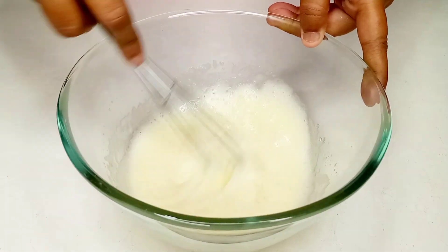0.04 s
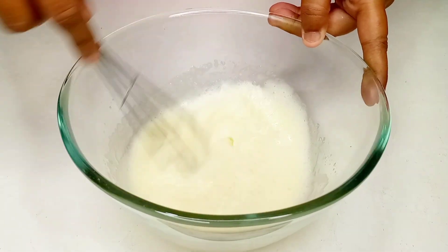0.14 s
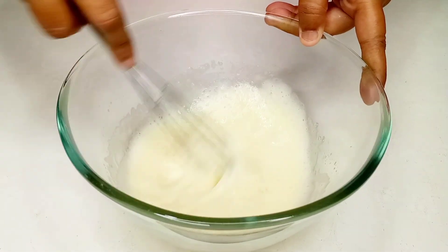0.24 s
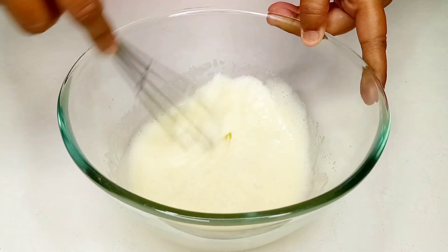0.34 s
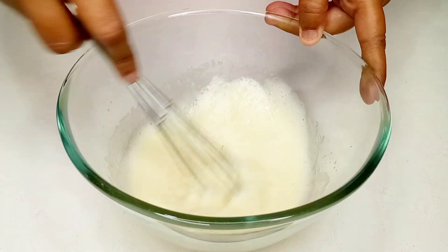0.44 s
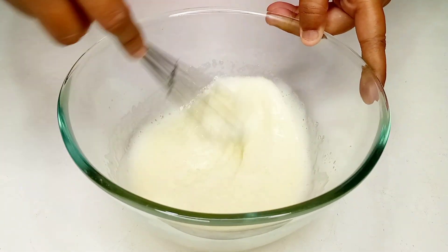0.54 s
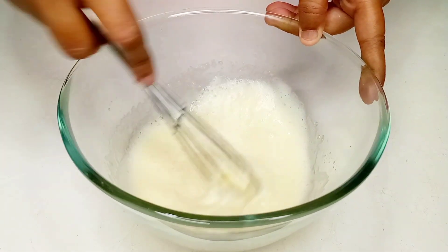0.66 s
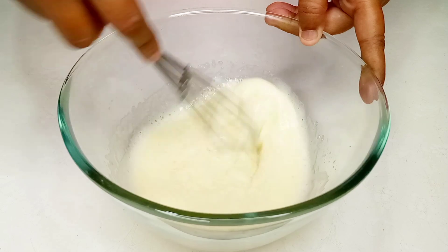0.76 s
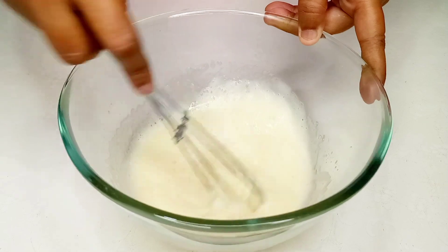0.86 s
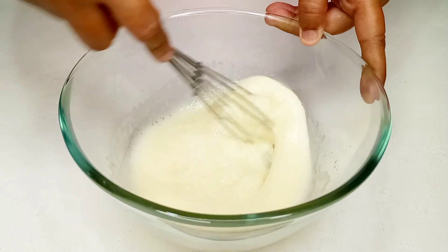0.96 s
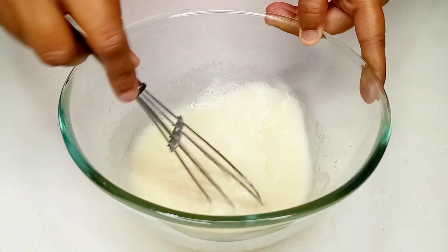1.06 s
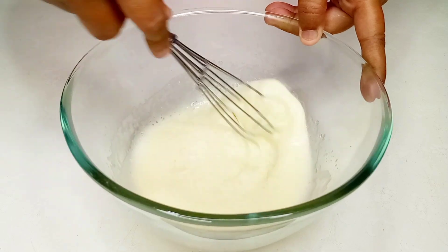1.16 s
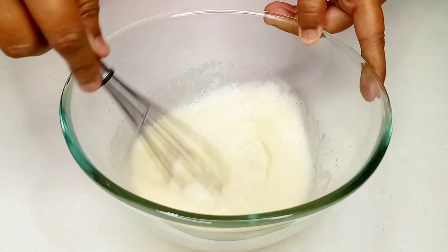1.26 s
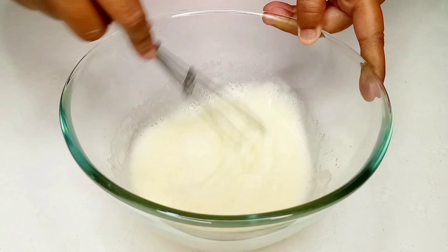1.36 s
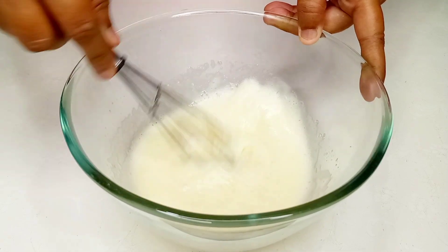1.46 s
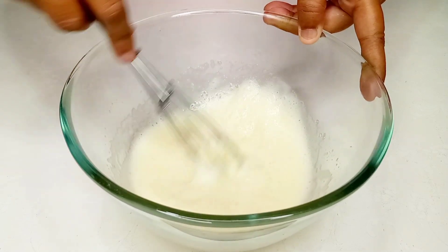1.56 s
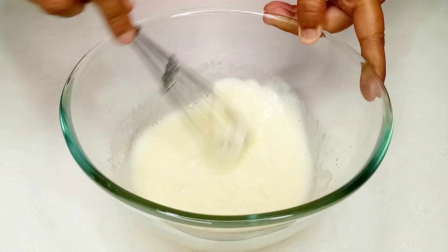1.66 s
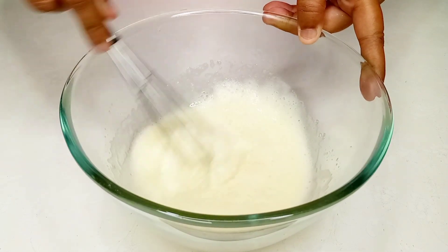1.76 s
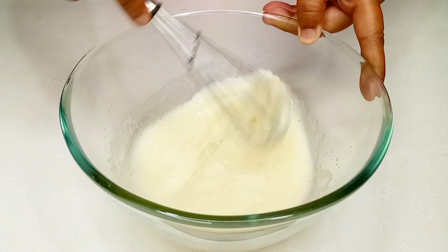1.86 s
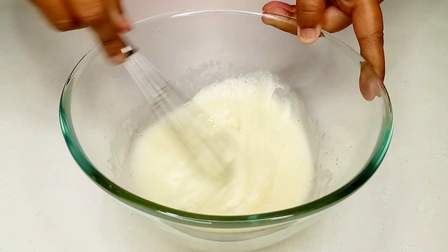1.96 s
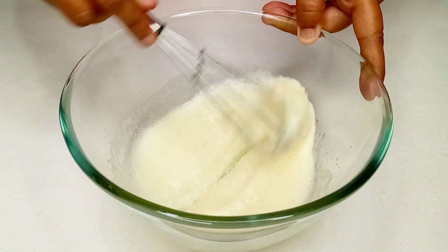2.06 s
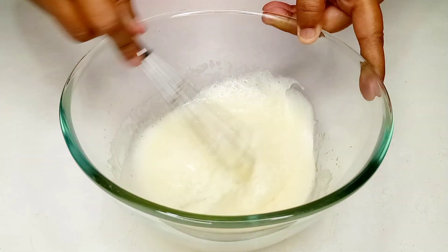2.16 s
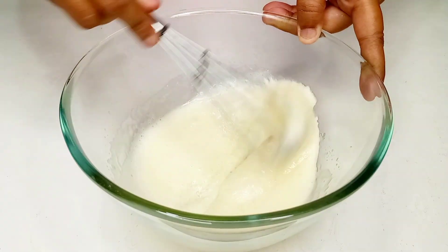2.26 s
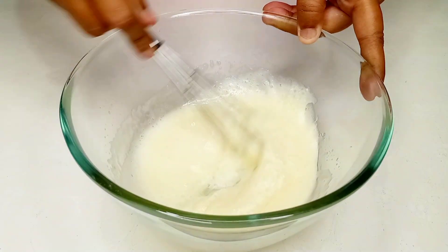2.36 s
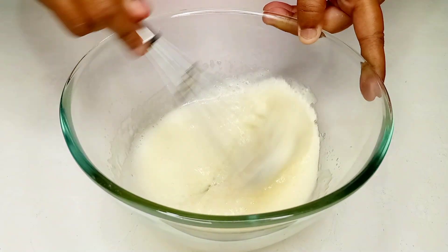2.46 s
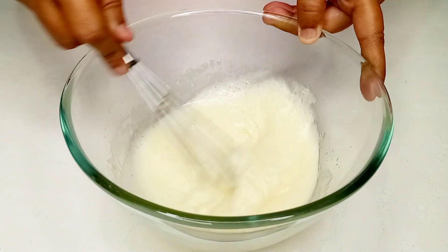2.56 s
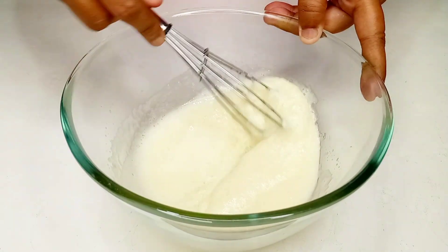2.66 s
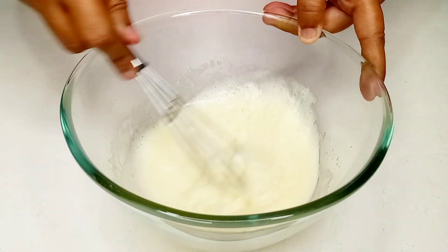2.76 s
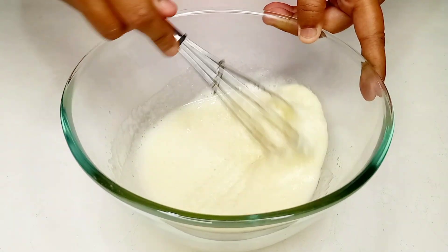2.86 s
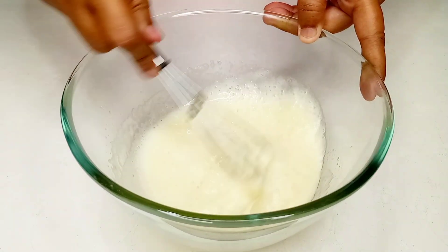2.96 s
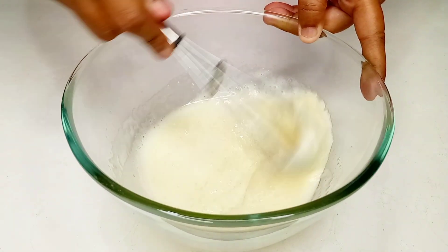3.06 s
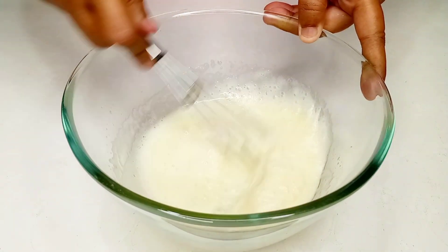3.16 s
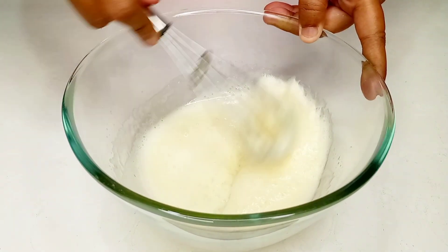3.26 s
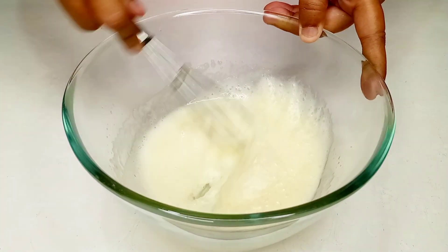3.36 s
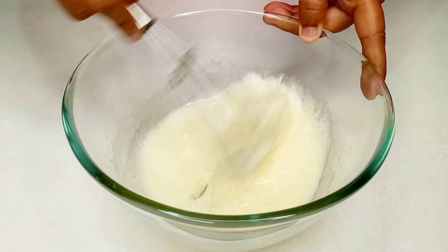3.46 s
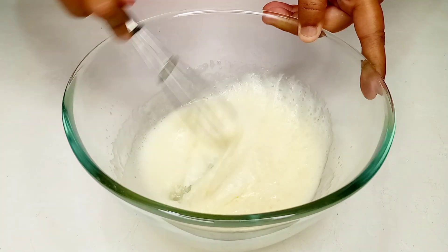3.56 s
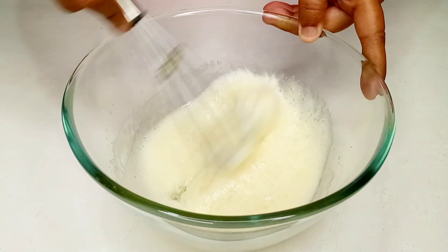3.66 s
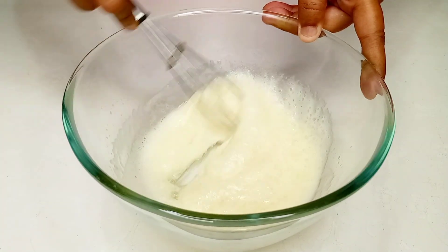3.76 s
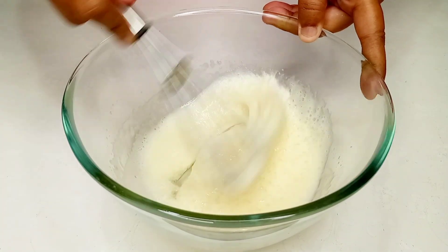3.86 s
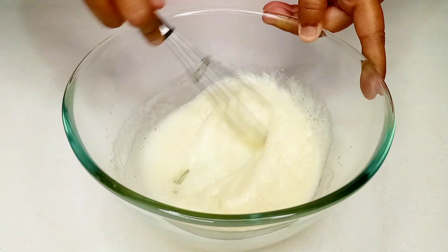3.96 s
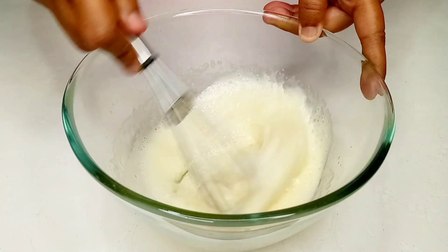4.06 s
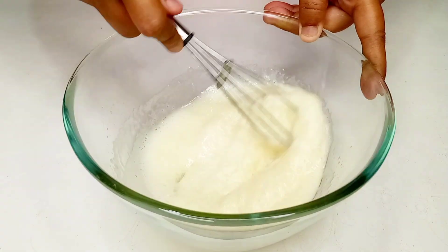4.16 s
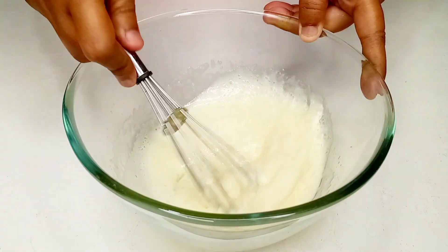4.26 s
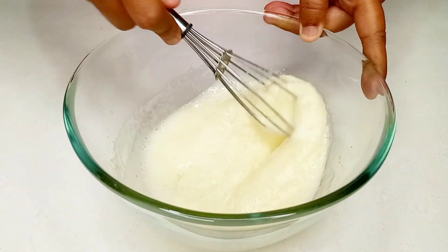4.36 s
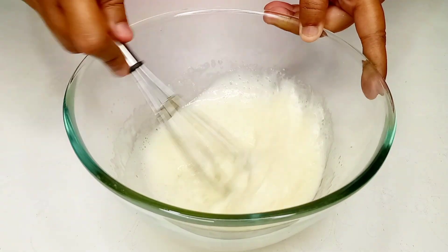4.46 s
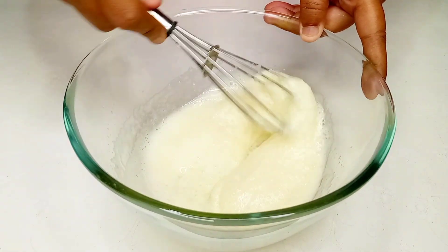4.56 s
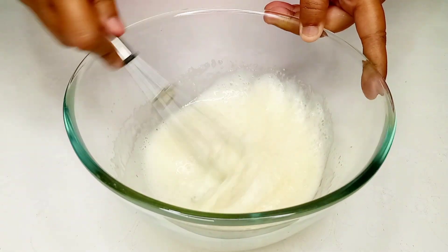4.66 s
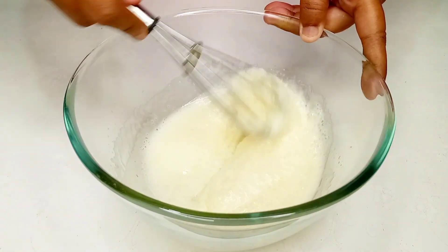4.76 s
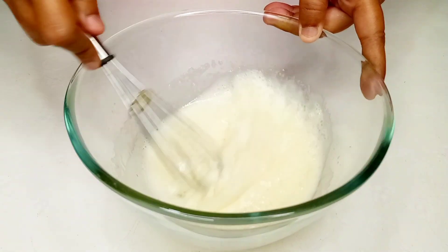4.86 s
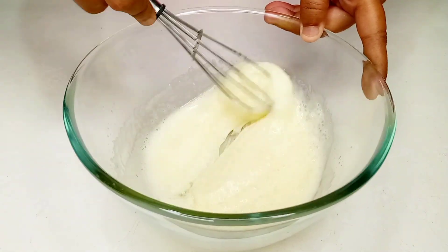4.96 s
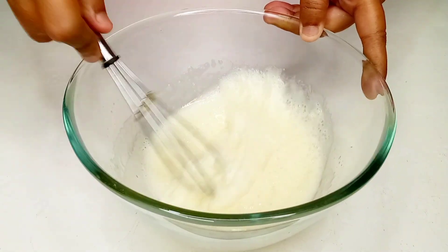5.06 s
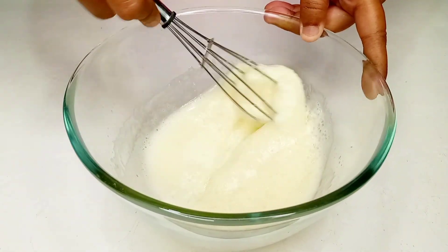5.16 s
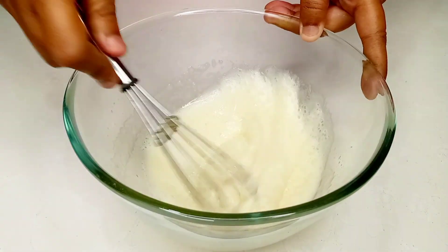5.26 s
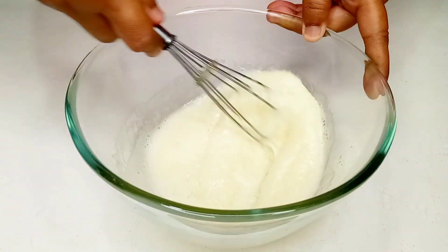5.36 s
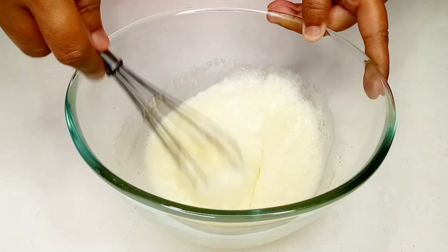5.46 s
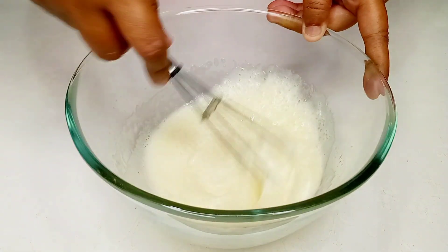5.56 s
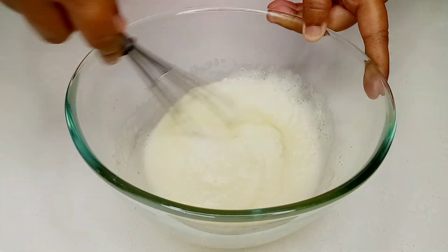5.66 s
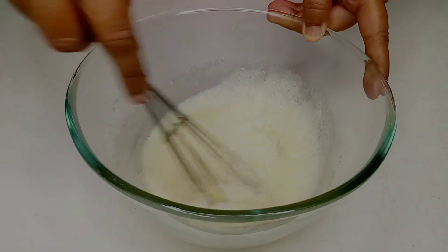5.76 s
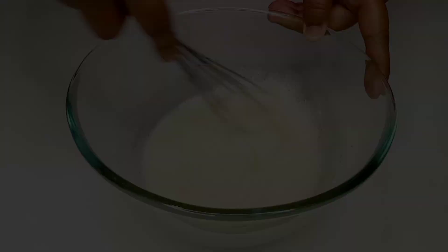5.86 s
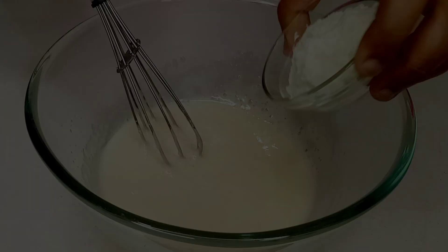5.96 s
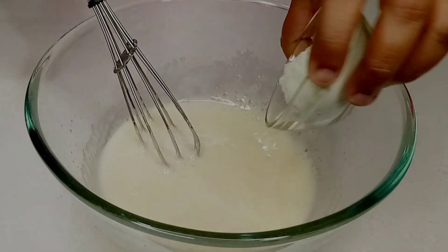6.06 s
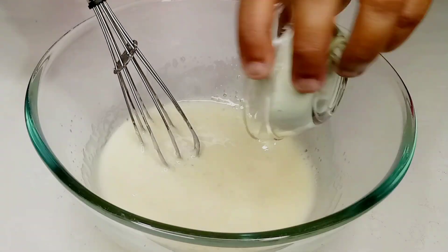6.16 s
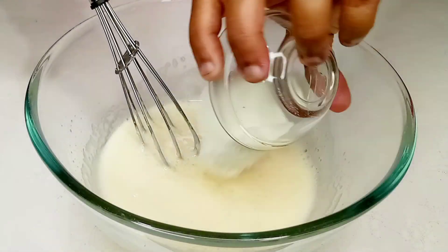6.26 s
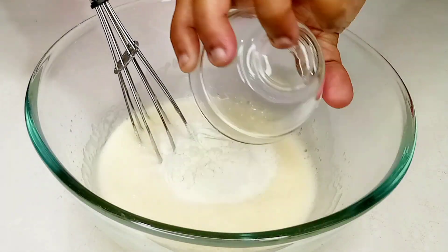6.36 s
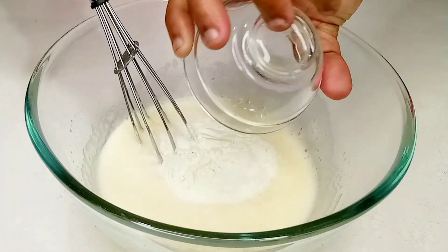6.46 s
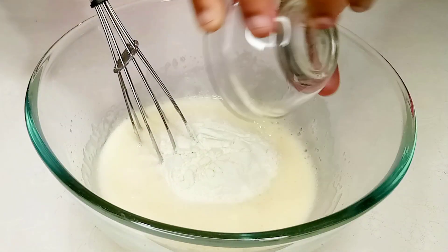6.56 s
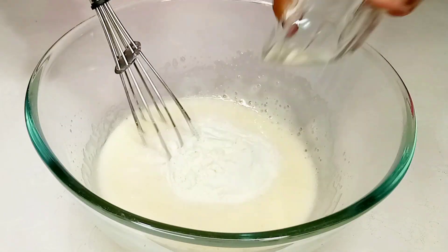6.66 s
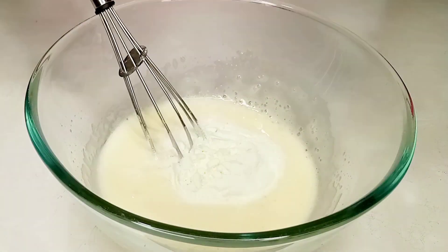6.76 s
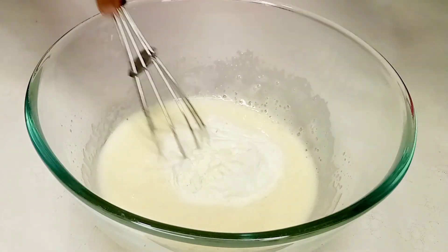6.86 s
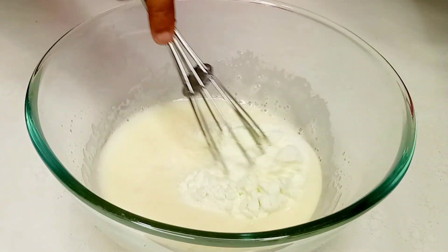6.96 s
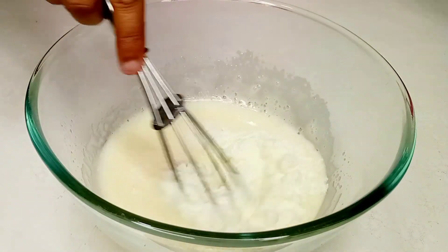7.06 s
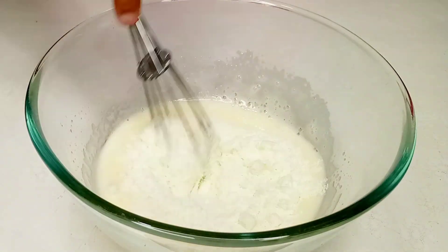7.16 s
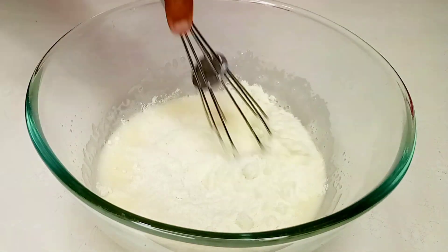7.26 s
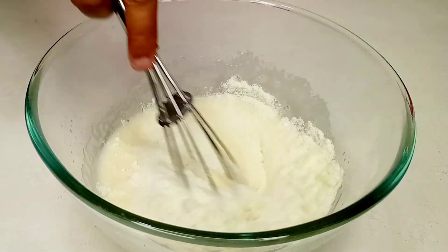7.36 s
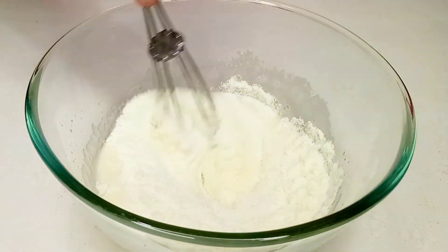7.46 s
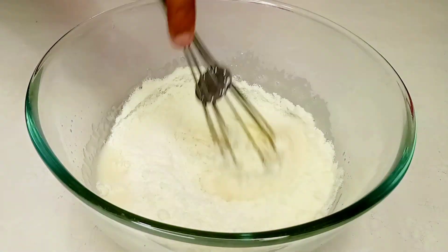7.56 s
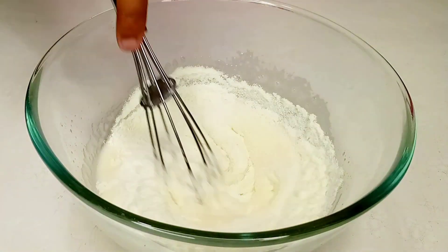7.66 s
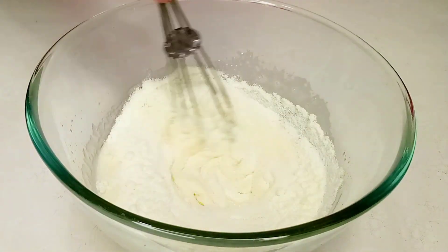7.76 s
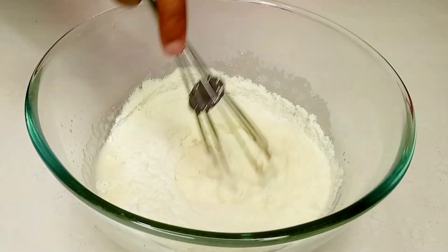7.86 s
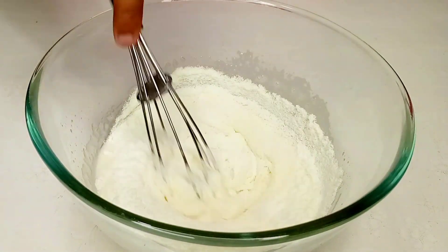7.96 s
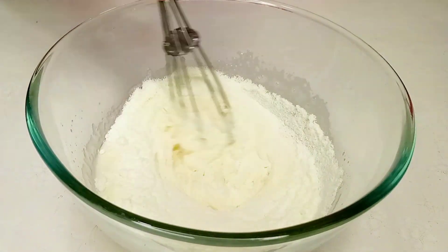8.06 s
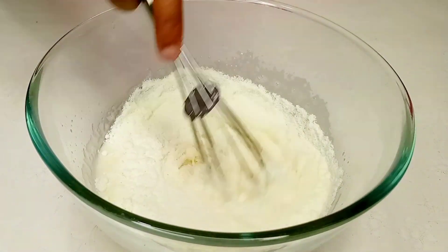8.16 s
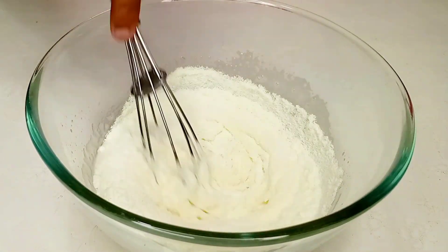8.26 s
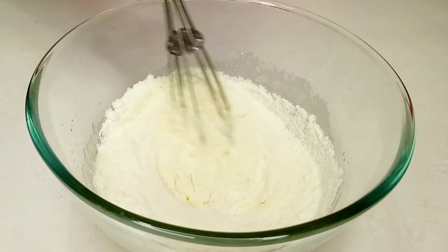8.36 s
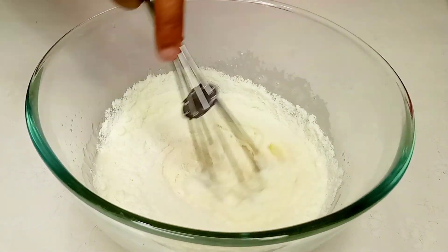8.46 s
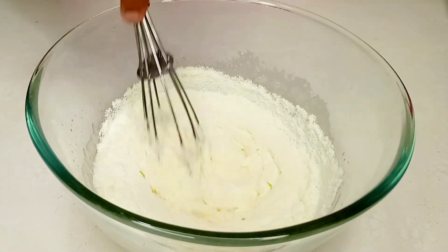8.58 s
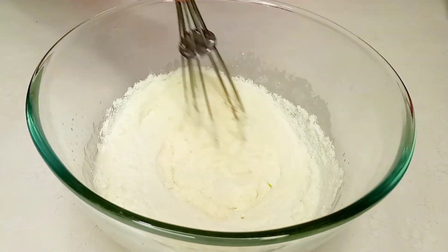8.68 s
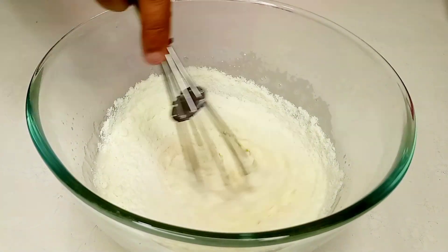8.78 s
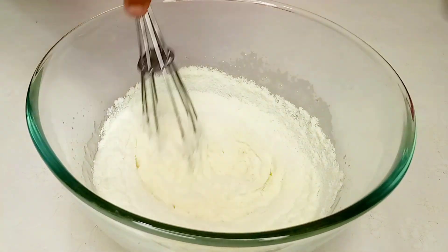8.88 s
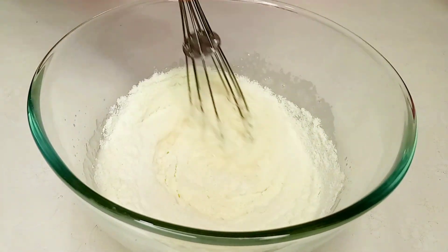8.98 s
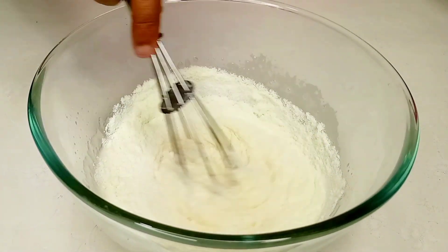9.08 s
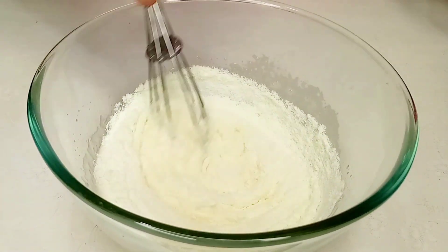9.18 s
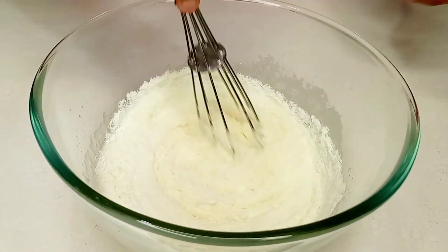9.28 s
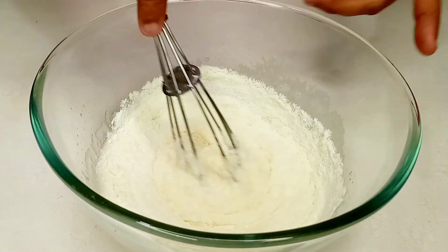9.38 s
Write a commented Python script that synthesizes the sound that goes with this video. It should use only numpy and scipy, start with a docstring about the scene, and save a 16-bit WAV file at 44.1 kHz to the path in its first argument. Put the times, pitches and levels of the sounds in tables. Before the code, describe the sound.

Close microphone, short room reverberation. Bright, jangly wires strike and drag along glass, with low bowl knocks and grainy batter splashes beneath. Beating begins as a fast rattle, then becomes slower and stronger, alternating a hard slap with a lighter return, with occasional clinks. After a very short gap of silence the whisk stirs gently, a soft swishing scrape with scattered dull bumps, far below the earlier level.

```python
"""Whisk and batter in a glass bowl

A wire whisk beats batter on a kitchen counter, fast at first, then gently after a short silence.
Each slap is a patter of noise; the drag along the glass is a stream of random grains.
Knocks excite damped modes of the loops, glass, bowl and counter; batter is coloured noise and grains.
A decaying random tail supplies the reverberation of the room.
"""
import sys
import numpy as np
from scipy import signal
from scipy.fft import rfft, irfft
from scipy.io import wavfile

SR = 44100
rng = np.random.default_rng(int(sys.argv[2]) if len(sys.argv) > 2 else 0)


def unload_audio(sound):
    """Save the sound as a 16-bit wav file, at the path given as the first command line argument."""
    columns = np.transpose(np.atleast_2d(sound))
    # keep every value between -1 and 1, then stretch to whole-number steps
    steps = np.round(np.clip(columns, -1, 1) * 32767)
    wavfile.write(sys.argv[1], SR, steps.astype(np.int16))


def to_linear_factor(level_db):
    """Convert decibel levels (scalar or array-like) to linear amplitude factors."""
    exponent = np.asarray(level_db, float) / 20
    return 10 ** exponent


N = 415422
SILENCE_START_S, SILENCE_END_S = 5.936, 6.066


def rms_one(x):
    """Normalisation: scale to an rms value of 1."""
    return x / np.sqrt(np.mean(x ** 2) + 1e-20)


def in_time(rows):
    """Linear interpolation: join the columns of a table by straight lines in time."""
    s, *columns = np.transpose(rows)
    return [np.interp(np.arange(N) / SR, s, column) for column in columns]


def samples_of(events):
    """Sampling: the nearest sample to the start of each event."""
    return [round(row[0] * SR) for row in events]


def coloured(x, spectrum):
    """Minimum-phase filtering: folding the cepstrum makes the given spectrum causal."""
    hz, level_db = np.transpose(spectrum)
    grid = np.fft.rfftfreq(4096, 1 / SR)
    log_level = np.interp(np.log(grid + 1), np.log(hz), level_db) * np.log(10) / 20
    cepstrum = irfft(log_level)
    cepstrum[1:2048] *= 2
    cepstrum[2049:] = 0
    response = rms_one(irfft(np.exp(rfft(cepstrum)))) / 64   # unit energy over 4096 samples
    return signal.fftconvolve(x, response)[:len(x)]


def drift(rate_hz):
    """Low-pass random process: white noise through two equal poles, rms 1."""
    r = np.exp(-2 * np.pi * rate_hz / SR)
    settling = SR // 4
    noise = rng.standard_normal(N + settling)
    return rms_one(signal.lfilter([1], [1, -2 * r, r * r], noise)[settling:])


def ring(clicks, hz, t60):
    """Damped resonance: a unit click starts a sine of height 1 that falls 60 dB in t60 seconds."""
    r, w = to_linear_factor(-60 / (t60 * SR)), 2 * np.pi * hz / SR
    return signal.lfilter([0, np.sin(w)], [1, -2 * r * np.cos(w), r * r], clicks + 1e-18)


def grains(per_s, spread_db):
    """Shot noise: random clicks of uneven size and sign, rms 1."""
    sizes = to_linear_factor(spread_db * np.minimum(rng.exponential(1, N), 5))
    sizes = sizes * rng.choice([-1, 1], N)
    return rms_one(sizes * (rng.random(N) < per_s / SR))


def body(modes, events, blows_db, rubbing, vary_db, contact_s, wander_db=0, lean_db=0):
    """Modal superposition: each blow drives every mode with its own strength; rubbing keeps them murmuring."""
    rough_share, lean_pivot_hz = 0.55, 430   # rough push against one firm tap
    at = samples_of(events)
    chance = rng.standard_normal((len(events), len(modes)))
    blows_db = np.broadcast_to(blows_db, chance.T.shape)
    fade = np.exp(-1 / (contact_s * SR))
    out = np.zeros(N)
    for k, (hz, level_db, t60) in enumerate(modes):
        tap = np.full(N, 1e-18)
        tap[at] = to_linear_factor(blows_db[k] + vary_db * chance[:, k])
        rough = signal.lfilter([np.sqrt(1 - fade ** 2)], [1, -fade], tap)
        push = rough_share * rough + (1 - rough_share) * tap
        push *= rng.choice([-1, 1], N)
        # a longer ring gathers more of the rubbing
        rub = rubbing * to_linear_factor(wander_db * np.tanh(drift(13.0))) / np.sqrt(t60 * SR)
        lean = to_linear_factor(lean_db * np.log2(hz / lean_pivot_hz))
        out += to_linear_factor(level_db) * ring((push + rub) * lean, hz, t60)
    return out


def patchy(x, patchy_db, rate_hz, sweep_db=0):
    """Subband modulation: quarter-octave bands swell on their own while a bright patch may sweep across."""
    edges = 150 * 2 ** np.arange(0, 7.1, .25)
    centre = 17 + 5 * drift(2)   # number of the band on which the patch sits
    out = np.zeros(N)
    for k, band in enumerate(zip(edges, edges[1:])):
        part = signal.sosfilt(signal.butter(2, band, "band", fs=SR, output="sos"), x)
        patch_db = sweep_db / (1 + ((k - centre) / 2) ** 2)
        swell = to_linear_factor(patchy_db * np.tanh(drift(rate_hz)) + patch_db)
        out += (-1) ** k * swell * part   # alternating signs keep the seams from cancelling
    return out


def split(x):
    """Band splitting: the parts below and above the sizzle edge."""
    edge_hz = 11000
    return [signal.sosfilt(signal.butter(4, edge_hz, kind, fs=SR, output="sos"), x)
            for kind in ("low", "high")]


def new_strokes():
    """Onset grouping: times of the fast slaps that follow a pause."""
    gap_s = 0.095
    s = np.transpose(SLAPS)[0]
    return s[1:][(np.diff(s) > gap_s) & (s[1:] < SILENCE_START_S)]


def kitchen(x):
    """Statistical reverberation: a dense random tail that builds up late, decays and is softened in the treble."""
    t60_s, build_s, cut_hz = 0.26, 0.02, 0.45 * SR
    t = np.arange(SR // 2) / SR
    tail = rng.standard_normal(len(t)) * to_linear_factor(-60 * t / t60_s) * (1 - np.exp(-t / build_s))
    tail = signal.lfilter(*signal.butter(1, cut_hz, fs=SR), tail)
    return signal.fftconvolve(x, tail / np.sqrt(np.sum(tail ** 2)))[:N]


# modes of the counter top: (f/Hz, level/dB, t60/s)
COUNTER_MODES = [(93, 0, .22), (116, -5, .15), (166, -3, .22), (205, -9, .12)]


def counter_top(scrape_db, rumble, counter_db):
    """Structure-borne sound: the counter takes a share of the bowl's thud and of the drag."""
    blow_db, rub_db = -5.5, 9
    _, peak_db, thud_db, _ = np.transpose(SLAPS)
    sound = body(COUNTER_MODES, SLAPS, peak_db + thud_db + blow_db,
                 to_linear_factor(scrape_db + rub_db) * rumble, vary_db=1.5, contact_s=0.024)
    return to_linear_factor(counter_db) * sound


# spectrum of batter thrown on the wall: (f/Hz, level/dB)
SPLASH_SPECTRUM = [(200, -10.5), (400, -13.5), (800, 2.5), (1500, -7.5), (2500, -12), (5000, -48.5)]


def splash(blows_db, decay_s):
    """Decaying shot noise: each slap throws batter in a grainy burst that dies away."""
    blows = np.full(N, 1e-18)
    blows[samples_of(SLAPS)] = to_linear_factor(blows_db)
    dying = signal.lfilter([1], [1, -np.exp(-1 / (decay_s * SR))], blows)
    return coloured(dying * grains(3000, spread_db=4.0), SPLASH_SPECTRUM)


# spectrum of batter folding over: (f/Hz, level/dB)
SLOSH_SPECTRUM = [(88, -44.5), (150, -9.5), (356, 3.5), (588, 2), (710, -20), (935, -14.5), (3000, -34.5),
                  (3900, -60), (6600, -120)]


def batter(rumble_db):
    """Filtered noise: batter slosh and spatter follow the drag, and splashes follow the slaps."""
    _, peak_db, thud_db, _ = np.transpose(SLAPS)
    folding = coloured(rng.standard_normal(N), SLOSH_SPECTRUM)
    slosh = to_linear_factor(rumble_db - 9.0) * patchy(folding, patchy_db=9.0, rate_hz=4.9)
    thrown = splash(peak_db + thud_db - 15.5, decay_s=0.037)
    drops = coloured(grains(1400, spread_db=5.5), SPLASH_SPECTRUM)
    spatter = to_linear_factor(rumble_db - 17.0) * patchy(drops, patchy_db=8.0, rate_hz=13.0)
    return slosh + thrown + spatter


# modes of the bowl as a whole: (f/Hz, level/dB, t60/s)
BOWL_MODES = [(299, -2, .18), (361, -4.5, .15), (415, -16, .12), (523, 1, .125), (595, -4.5, .1),
              (646, -8, .1), (753, -11, .13), (923, -13, .1), (1015, -13, .12), (1115, -13, .1)]


def thud_loss_db():
    """Selective excitation: the first blow of a stroke favours higher bowl modes, all other slaps lower ones."""
    stroke_hz, stroke_loss_db, stroke_s = 498, 13, 0.03   # loss one octave away
    return_hz, return_loss_db = 340, 5.5                  # lands on the other side
    s, strokes = np.transpose(SLAPS)[0], np.append(-1, new_strokes())
    latest = strokes[np.searchsorted(strokes, s, side="right") - 1]
    hz = np.transpose(BOWL_MODES)[0][:, None]
    stroke_db = stroke_loss_db * np.log2(hz / stroke_hz) ** 2
    return_db = return_loss_db * np.log2(hz / return_hz) ** 2
    return np.where(s - latest < stroke_s, stroke_db, return_db)


# dull thumps of the loaded whisk on the bowl: (t/s, level/dB, favoured f/Hz)
THUMP_EVENTS = [(0.423, -32.5, 536), (0.575, -34, 300), (0.684, -34.5, 540), (0.789, -36, 300),
                (0.878, -37, 536), (0.993, -32.5, 297), (1.446, -37, 537), (3.767, -27.5, 340),
                (4.907, -26, 357), (4.909, -24, 1020), (4.921, -27, 350), (4.937, -31, 940),
                (4.977, -34, 330), (6.727, -45, 510), (7.321, -50, 515), (7.5435, -37, 620),
                (7.68, -58, 500), (7.71, -46.5, 500), (7.8358, -43.5, 610), (7.852, -45, 610),
                (7.885, -45, 700), (7.93, -46.5, 504), (8.1028, -57, 650), (8.9103, -50, 450)]


def bowl(rumble_db, rumble, lean_db):
    """Forced and free vibration: slaps and thumps set the bowl ringing while the rumble sustains it."""
    thump_loss_db = 28   # one octave from the favoured pitch
    _, peak_db, thud_db, _ = np.transpose(SLAPS)
    thuds = body(BOWL_MODES, SLAPS, peak_db + thud_db + 0.5 - thud_loss_db(),
                 to_linear_factor(rumble_db + 4.0) * rumble, vary_db=1.0, contact_s=0.0078,
                 wander_db=4.5, lean_db=lean_db)
    _, thump_db, thump_hz = np.transpose(THUMP_EVENTS)
    blows_db = [thump_db - thump_loss_db * np.log2(hz / thump_hz) ** 2 for hz, _, _ in BOWL_MODES]
    return thuds + body(BOWL_MODES, THUMP_EVENTS, blows_db, 0, vary_db=1.5, contact_s=1e-5)


# modes of the glass wall, long ones in close pairs that beat, short ones for the knock;
# t60 is that of the held glass: (f/Hz, level/dB, t60/s)
GLASS_MODES = [(920, -2, .04), (1150, 0, .03), (1366, -6, .13), (1385, -9, .12), (1520, 0, .04),
               (1850, -2, .025), (2455, -10, .19), (2482, -13, .14), (3700, 2, .025), (3774, -3, .14),
               (3800, -9, .1), (4334, -12, .08), (5410, -1, .12), (7820, 0, .1), (11590, -5, .05)]
# harder knocks that set the glass ringing; the spot struck favours some modes:
# (t/s, level/dB, favoured f/Hz, loss one octave away/dB)
CLINK_EVENTS = [(0.3499, -28, 2620, 49), (2.273, -41, 2620, 43), (2.464, -35, 2600, 60),
                (3.7592, -20, 2970, 26), (3.763, -22.5, 1900, 40), (5.2873, -30, 2980, 27),
                (6.068, -60, 1250, 20), (6.068, -69.5, 3180, 6), (6.1806, -54, 1520, 10),
                (6.189, -46, 1305, 29), (6.19, -62, 5400, 20), (6.197, -55.5, 2430, 27),
                (6.312, -63, 2470, 42), (6.729, -49, 1280, 12), (7.543, -48, 1510, 25)]


def glass_wall(scrape, gentle):
    """Modal damping: the glass rings longer once the hand lets go of the rim."""
    hand_off_s, free_ring = 6.0, 2.1
    knock_t60_s = 0.05   # modes as short as this make the knock and die as fast as ever
    most_loss_db, absent_db = 29.0, -200   # no mode stays quite silent
    s, knock_db, favoured_hz, loss_db = np.transpose(CLINK_EVENTS)
    ring_db = np.array([knock_db - np.minimum(loss_db * np.log2(hz / favoured_hz) ** 2, most_loss_db)
                        for hz, _, _ in GLASS_MODES])
    free = s > hand_off_s
    freed_modes = [(hz, level_db, t60 * (free_ring if t60 > knock_t60_s else 1))
                   for hz, level_db, t60 in GLASS_MODES]
    held = body(GLASS_MODES, CLINK_EVENTS, ring_db + absent_db * free,
                to_linear_factor(-20.0) * scrape * ~gentle, vary_db=1.5, contact_s=1e-5)
    freed = body(freed_modes, CLINK_EVENTS, ring_db + absent_db * ~free,
                 to_linear_factor(-15.0) * scrape * gentle, vary_db=1.5, contact_s=1e-5)
    waver = to_linear_factor(4.0 * np.tanh(drift(35)))   # batter washing over the wall
    return (held + freed) * waver


# modes of the wire loops: (f/Hz, level/dB, t60/s)
LOOP_MODES = [(3080, -6, .04), (3550, -2, .04), (4190, -1, .05), (4500, -1, .04), (4790, -4, .06),
              (4930, -4, .06), (6060, -6, .05), (6420, -6, .05), (7083, -7, .07), (7205, -3, .09),
              (7350, -3, .04), (8220, -6, .06), (8600, -9, .05), (9250, -10, .05)]


def wire_loops(scrape):
    """Resonance: slaps and scraping excite the damped modes of the wire loops."""
    peak_db = np.transpose(SLAPS)[1]
    return body(LOOP_MODES, SLAPS, peak_db - 22.0, to_linear_factor(-14.0) * scrape,
                vary_db=3.0, contact_s=0.00052, wander_db=4.5)


def lift_db():
    """Loss of contact: the whisk comes off the wall just before every new stroke."""
    depth_db, time_s = -14, 0.049
    strokes, t = new_strokes(), np.arange(N) / SR
    until = np.append(strokes, np.inf)[np.searchsorted(strokes, t)] - t
    return depth_db * np.exp(-until / time_s)


# the drag along the wall, before the lifts: (t/s, wire scrape level/dB, bowl rumble level/dB)
DRAG_LEVELS = [(0.0, -54, -37), (0.07, -58, -60), (0.3, -47.5, -47), (0.6, -56, -45), (1.42, -54.5, -60),
               (1.6, -59.5, -57.5), (1.86, -49, -58), (1.98, -72, -63.5), (2.05, -52.5, -56),
               (3.0, -60.5, -55), (4.2, -52, -53), (5.3, -59, -52.5), (5.55, -53, -53.5),
               (5.93, -74, -77.5), (6.07, -79.5, -87), (6.22, -82, -63.5), (6.3, -73, -62),
               (6.33, -64, -68), (6.51, -58, -64.5), (6.78, -56.5, -62), (7.1, -60, -64.5),
               (7.35, -59.5, -63.5), (7.51, -65, -83), (7.56, -57, -42.5), (7.66, -61, -56.5),
               (7.8, -62.5, -53), (7.86, -62.5, -46.5), (8.06, -62.5, -64.5), (8.12, -64.5, -58),
               (8.2, -62.5, -62.5), (8.29, -68.5, -74.5), (8.43, -61, -63), (8.57, -64.5, -71),
               (8.7, -62, -63), (8.89, -78, -72.5), (8.92, -59.5, -55.5), (9.15, -59.5, -66.5),
               (9.42, -60, -60)]


def drag_levels():
    """Amplitude envelope: the scrape sinks with each lift, the rumble half as far in dB."""
    scrape_db, rumble_db = in_time(DRAG_LEVELS)
    lift = lift_db()
    return scrape_db + lift, rumble_db + .5 * lift


def dragged_wires(scrape_db, scrape, gentle):
    """Friction noise: patches of scraping, with flicks of single wires on the wall."""
    ticks_per_s, tick_s, tick_db, gentle_tick_db = 70.0, 0.0012, -10.0, -12
    patches = patchy(scrape, patchy_db=7.0, rate_hz=10.0, sweep_db=4.5 * gentle)
    clicks = np.abs(grains(ticks_per_s, spread_db=1.0))
    flicks = signal.lfilter([1], [1, -np.exp(-1 / (tick_s * SR))], clicks)
    ticks = rms_one(flicks * rng.standard_normal(N))
    return to_linear_factor(-8.5) * patches + to_linear_factor(scrape_db + tick_db + gentle_tick_db * gentle) * ticks


# wires meeting the glass, a hard stroke and its lighter return:
# (t/s, peak level/dB, thud level re peak/dB, sizzle level re peak/dB)
SLAPS = [(0.001, -25, -11.5, -16), (0.079, -28.5, -6, -30), (0.1212, -38, -1, 0), (0.1443, -25.5, -5, -9),
         (0.21, -25, -9.5, -27), (0.241, -30, -38, -34), (0.2942, -23.5, -11.5, -26),
         (0.3485, -25.5, -6, -5.5), (0.4202, -24.5, -16, -14), (0.435, -23.5, -38.5, -11.5),
         (0.505, -38, -3, -20), (0.5252, -21, -16.5, -24), (0.5759, -22.5, -18, -17),
         (0.633, -24.5, -13, -29), (0.6786, -34.5, -9, -21), (0.7131, -28.5, -33, -13),
         (0.774, -36, -6, -9), (0.8413, -30, -16, -16), (0.8731, -25, -17, -19),
         (0.9356, -28.5, -15.5, -32), (0.9846, -28.5, -5.5, -5), (1.049, -52, -24, 5),
         (1.098, -49, -17, -2), (1.1607, -26, -15, -31), (1.2, -24.5, -11, -7.5), (1.2918, -23, -17.5, -16),
         (1.3821, -28.5, -13, -27), (1.4387, -21, -10.5, -10.5), (1.5175, -27.5, -13, -24),
         (1.6104, -39.5, -12, -16), (1.6456, -43, -25, 0), (1.6701, -28, -9.5, -5),
         (1.7898, -19.5, -16.5, -22), (1.998, -41, -22, -12), (2.0119, -21.5, -11.5, -12),
         (2.197, -35, -20, -32), (2.2079, -23, -10.5, -19), (2.2142, -21, -11.5, -15),
         (2.276, -24, -17, -5.5), (2.402, -37, -22, -29), (2.4096, -12.5, -17.5, -27),
         (2.4638, -22, -17.5, -17), (2.582, -40, -39, -10), (2.5936, -22.5, -9.5, -17),
         (2.659, -25, -12.5, -10.5), (2.789, -18, -16, -20), (2.8542, -23, -16, -19),
         (2.9789, -20.5, -12, -22), (3.027, -23.5, -30, -17), (3.053, -27.5, -17, -11),
         (3.1602, -21.5, -11.5, -33), (3.169, -21, -19, -16), (3.2122, -32, -5, -6.5),
         (3.3674, -14, -15, -18.5), (3.4458, -27.5, -26.5, -27.5), (3.456, -30, -43, -12.5),
         (3.558, -15, -13.5, -12.5), (3.6326, -23.5, -10.5, -12), (3.756, -25.5, -24.5, -27),
         (3.761, -10, -12.5, -25), (3.962, -13, -17.5, -18), (4.0217, -25, -12, -13),
         (4.148, -19.5, -14.5, -23), (4.2109, -28.5, -5.5, -11.5), (4.328, -19, -17.5, -16),
         (4.3874, -29.5, -13, -8.5), (4.5193, -12.5, -21.5, -23), (4.581, -24.5, -6, -12),
         (4.7069, -17, -15.5, -14.5), (4.7702, -21, -12.5, -9.5), (4.8952, -15, -16, -17),
         (4.952, -15, -22, -18.5), (5.1011, -14, -19.5, -15), (5.167, -27, -7, -7),
         (5.2908, -12.5, -21, -15), (5.3306, -28, -10.5, -14), (5.3717, -26.5, -8.5, -9.5),
         (5.482, -22.5, -13, -12.5), (5.556, -38, -41, -50), (5.6418, -33.5, -10, -7),
         (5.8026, -43, -12.5, -16), (5.8573, -43.5, -13, -12), (5.892, -54, -13, -20),
         (6.1892, -42.5, -5, -22), (6.529, -38, -15, -35), (6.576, -37, -16, -26),
         (6.6843, -37.5, -13, -30), (6.7286, -33, -4.5, -19), (6.9503, -38.5, -29, -26),
         (7.019, -42.5, -10, -22), (7.222, -43, -13, -16), (7.5446, -43, 3.5, 0.5),
         (7.876, -41.5, -10, -32), (8.102, -47, 1.5, -33), (8.412, -45, -23, -14), (8.9111, -38, -11, -36),
         (8.99, -37.5, -7.5, -41), (9.04, -36, -6.5, -25)]


def wire_slaps():
    """Multiple impact: wires land in a swelling patter, crack, then shiver against each other."""
    landing_s, crack_s, shiver_s, shiver_db = 0.00084, 0.00071, 0.025, -12.0
    early_s, early_db = 0.012, -31.5   # faint noise ahead of each slap
    stray_s, stray_db = 0.075, -30     # latest and loudest straggler
    clang_s, clang_db = 0.0012, -4.0   # each slap rings on briefly in its own colour
    lead = 2000
    t = np.arange(-lead, 6000) / SR
    patter = rng.standard_normal((len(SLAPS), len(t)))
    # uneven from one millisecond to the next
    patter *= to_linear_factor(3.0 * rng.standard_normal((len(SLAPS), len(t) // 40))).repeat(40, axis=1)
    strays = rng.random((len(SLAPS), 3, 2))
    clangs = rng.standard_normal((len(SLAPS), 600)) * np.exp(-np.arange(600) / (clang_s * SR))
    clangs *= to_linear_factor(clang_db) / np.sqrt(clang_s * SR / 2)
    clangs[:, 0] = 1
    out = np.zeros((2, N + len(t)))
    for (s, peak_db, _, sizzle_db), noise, stray, clang in zip(SLAPS, patter, strays, clangs):
        # a glancing slap skids: it sizzles more and its wires land further apart
        spread_s = landing_s * (1 + to_linear_factor(2.0 * min(sizzle_db + 13.5, 6.0)))
        fall = np.exp(-t / (crack_s + spread_s)) + to_linear_factor(shiver_db) * np.exp(-t / shiver_s)
        shape = np.where(t < 0, np.exp(np.minimum(t, 0) / spread_s), fall)
        shape += to_linear_factor(early_db) * (t > -early_s) * (t < 0)
        for late, size in stray:
            shape += to_linear_factor(stray_db) * size * np.exp(-np.abs(t - late * stray_s) / landing_s)
        burst = to_linear_factor(peak_db - 13.0) * signal.fftconvolve(shape * noise, clang)[:len(t)]
        i = round(s * SR)
        out[:, i:i + len(t)] += burst * to_linear_factor([[0], [sizzle_db + 16.0]])
    return out[0, lead:lead + N], out[1, lead:lead + N]


# colour of wire on glass: (f/Hz, level/dB)
WIRE_SPECTRUM = [(530, -18.5), (900, -11), (1390, -11.5), (1790, -23), (2050, -10), (2420, -12.5),
                 (2690, -10.5), (3300, -7), (3730, -4.5), (5750, -10.5), (7230, -5.5), (12000, -23),
                 (15100, -12.5), (16000, -31)]
# flour in the batter recolours the wires in gentle stirring: (f/Hz, level/dB)
GENTLE_SPECTRUM = [(1200, 0), (2000, -3), (3500, -3.5), (4600, 0), (11000, -0.5)]


def wires_on_glass(scrape_db, scrape, gentle):
    """Source and filter: slaps and drag excite the colour of wire on glass; a harder drag is brighter."""
    slap, slap_sizzle = wire_slaps()
    dragged = dragged_wires(scrape_db, scrape, gentle)
    drag_sizzle = to_linear_factor(0.12 * (scrape_db + 35.0)) * dragged
    contact = split(slap + dragged)[0] + split(slap_sizzle + drag_sizzle)[1]
    stirred = to_linear_factor(-1.0) * coloured(contact * gentle, GENTLE_SPECTRUM)
    return coloured(contact * ~gentle + stirred, WIRE_SPECTRUM)


# how the low sound is shared: (t/s, lean of the bowl's modes/(dB per octave), counter level/dB)
LOW_SHARES = [(0.0, -3, 0), (1.4, 9, 1), (1.8, -1, -3.5), (3.0, 3, -1), (3.8, -3.5, -5), (4.3, 2.5, 1),
              (5.0, 0, 0.5), (5.9, 4, -6.5), (6.1, 1.5, -11), (7.0, 2.5, -11), (8.0, -7, -26),
              (8.5, 6.5, -1.5), (9.42, -3, -16.5)]


def scene():
    """Superposition: counter, batter, bowl, glass, loops and wires add, and the kitchen reverberates."""
    room_db = -9.5
    gentle = np.arange(N) / SR > SILENCE_START_S
    scrape_db, rumble_db = drag_levels()
    lean_db, counter_db = in_time(LOW_SHARES)
    # the drag comes in fits as wires catch and let go
    scrape = to_linear_factor(scrape_db + 1.7 * drift(30)) * grains(9000, spread_db=2.5)
    rumble = to_linear_factor(2.1 * drift(23)) * grains(510, spread_db=3.5)
    near = counter_top(scrape_db, rumble, counter_db)
    near = near + batter(rumble_db)
    near = near + bowl(rumble_db, rumble, lean_db)
    near = near + glass_wall(scrape, gentle)
    near = near + wire_loops(scrape)
    near = near + wires_on_glass(scrape_db, scrape, gentle)
    return (near + to_linear_factor(room_db) * kitchen(near))[None]


def band_limit(x):
    """A steep low-pass at the top of the band."""
    return signal.sosfilt(signal.butter(12, 16990, fs=SR, output="sos"), x)


def record(dry):
    """Gating and band limiting: the sound fades out, is silent and cuts back in; deep bass and top are lost."""
    t = np.arange(N) / SR
    fade_out = np.clip((SILENCE_START_S - t) / .03, 0, 1)
    cut_in = np.clip((t - SILENCE_END_S) / .012, 0, 1)
    thin = signal.sosfilt(signal.butter(4, 74, "high", fs=SR, output="sos"), dry)
    thin = signal.sosfilt(signal.cheby2(12, 28, 16000, fs=SR, output="sos"), thin)
    return band_limit(thin * (fade_out + cut_in))


dry = scene()
out = record(dry)
unload_audio(out)
```